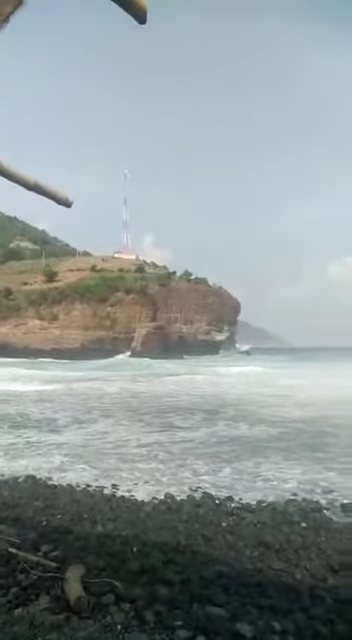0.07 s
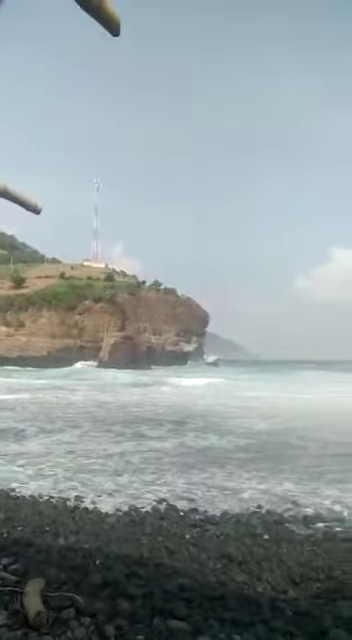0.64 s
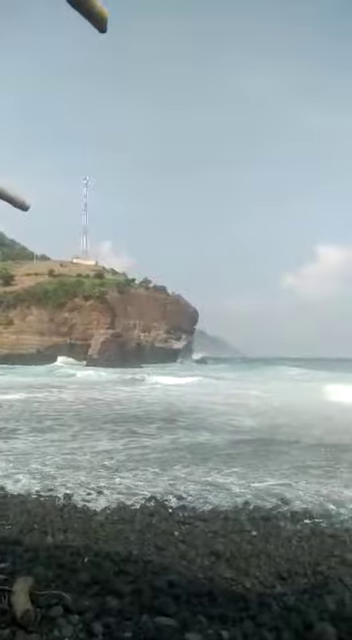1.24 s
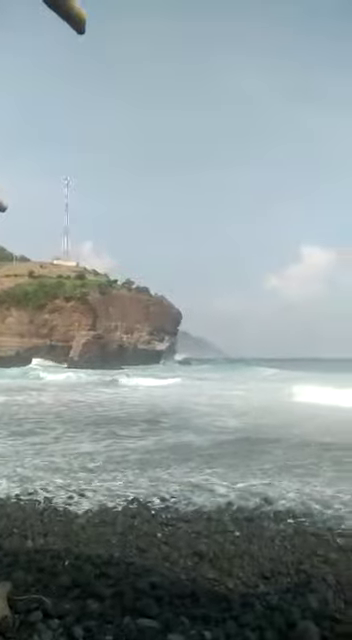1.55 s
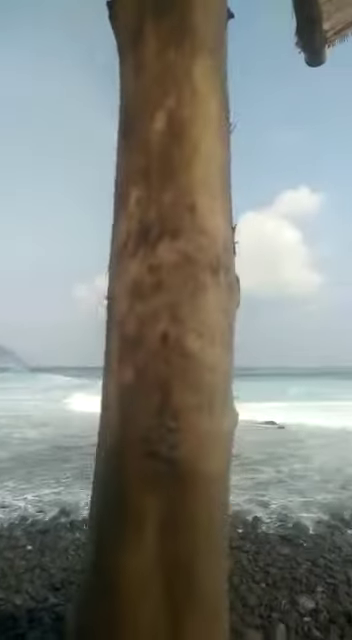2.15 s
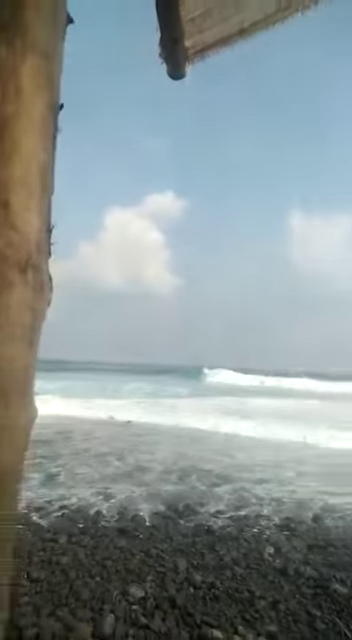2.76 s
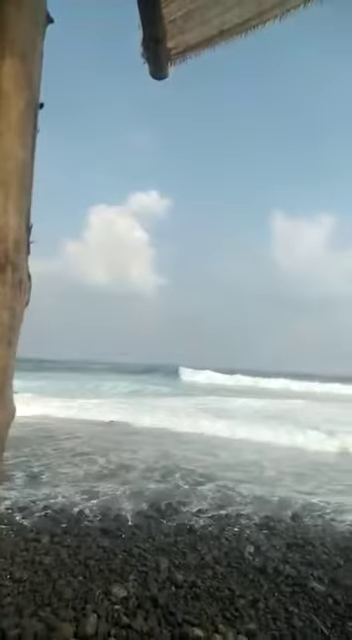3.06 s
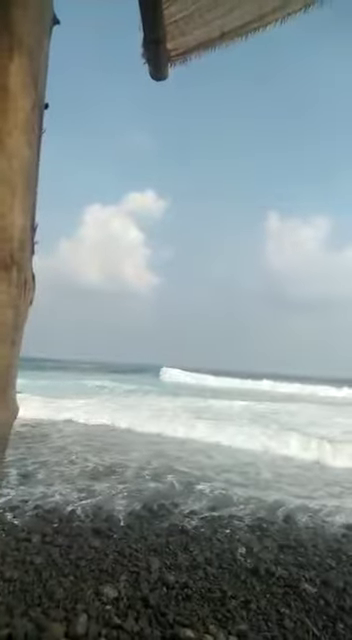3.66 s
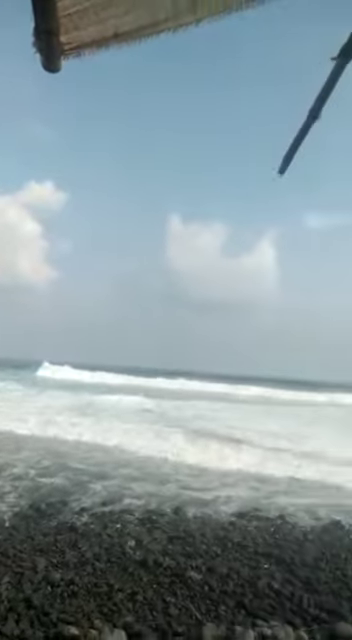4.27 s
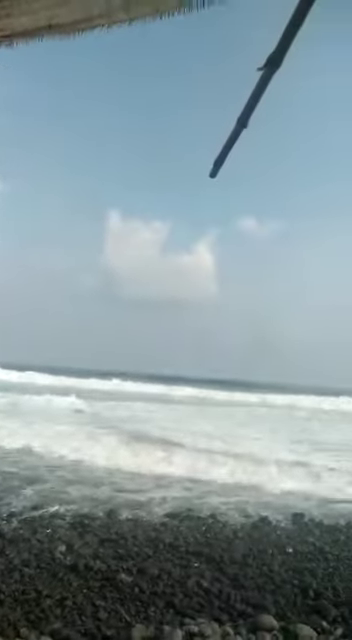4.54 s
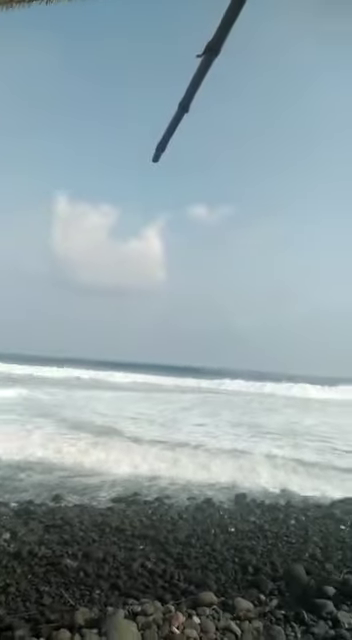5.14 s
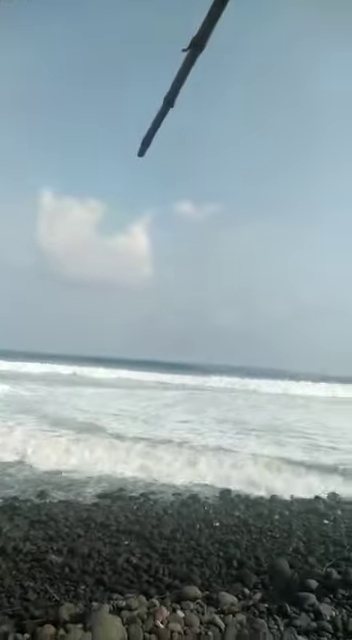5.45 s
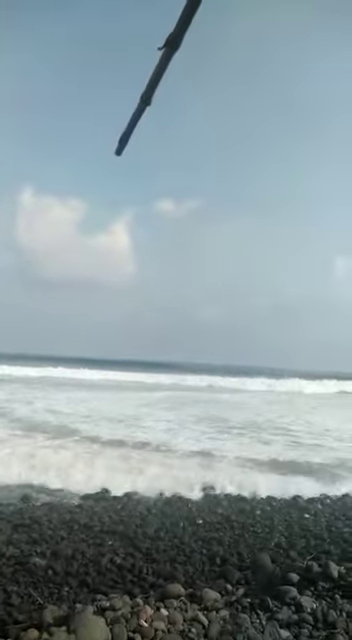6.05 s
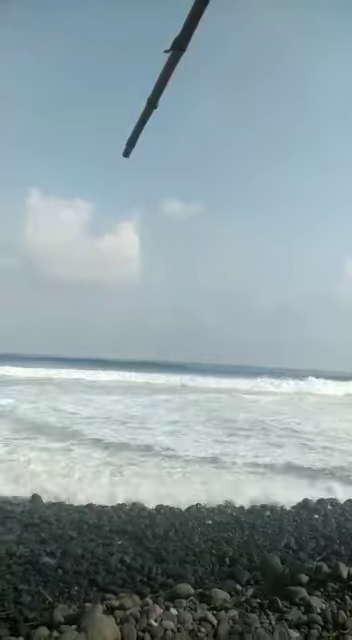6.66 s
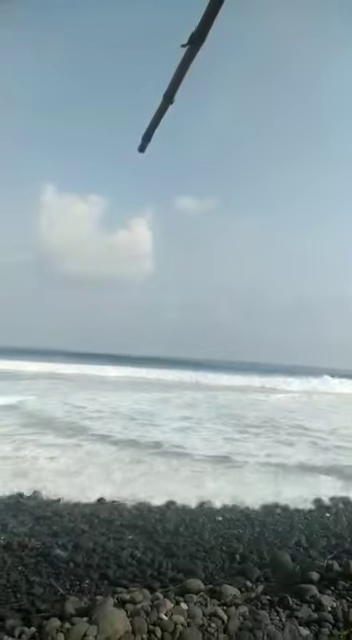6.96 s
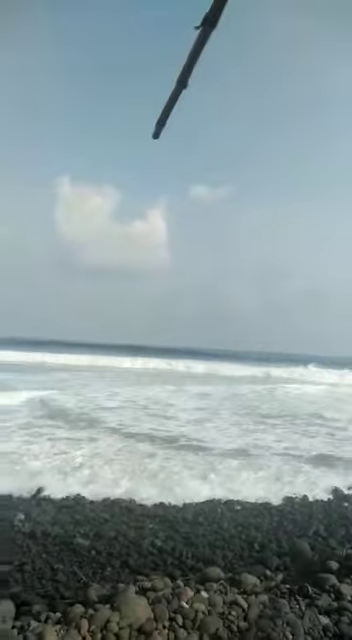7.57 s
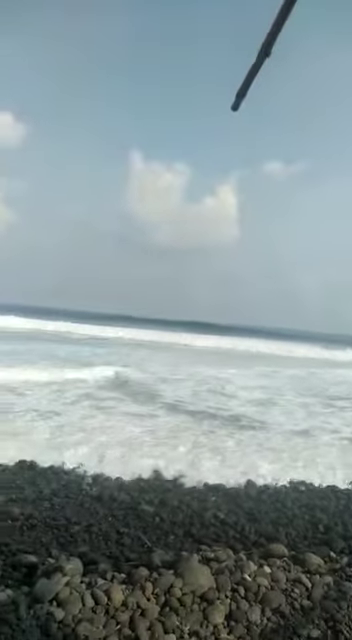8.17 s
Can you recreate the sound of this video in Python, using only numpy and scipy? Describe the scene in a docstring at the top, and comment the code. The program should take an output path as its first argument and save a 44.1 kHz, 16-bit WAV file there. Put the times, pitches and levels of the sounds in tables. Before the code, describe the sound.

On a cobble beach, the distant sea roars dully and pebbles clink faintly while hard gusts of wind thump the microphone, mostly on the right. A wave then breaks with a gurgling churn, and its foam rushes closer, growing louder. It lands with tumbling water, clacking stones and a fizz of tiny bubbles, then begins to ebb as the gusts pick up again.

```python
"""Rough surf on a cobble beach, at two ports of a turning hand-held microphone in gusty wind.
First the far sea roars and pebbles clink; gusts rumble, the hardest overloading the right port.
From 2.4 s a wave breaks: a patchy churn with gulp-like tones; foam and spray run shoreward.
Near 6.5 s it lands: water tumbles, pebbles clack, tiny bubbles hiss on the stones.
By 8 s the wave is ebbing and the gusts pick up again."""
import sys
import numpy as np
from scipy import signal
from scipy.fft import rfft, irfft
from scipy.io import wavfile

SR = 44100
rng = np.random.default_rng(int(sys.argv[2]) if len(sys.argv) > 2 else 0)


def log_audio(samples):
    """Write samples as a 16-bit WAV file to the path given in sys.argv[1]."""
    # one column per channel
    frames = np.atleast_2d(samples).T
    # limit to full scale, then quantise
    limited = np.clip(frames, -1, 1)
    pcm = np.round(limited * 32767).astype(np.int16)
    wavfile.write(sys.argv[1], SR, pcm)


N = 366471
TIME_S = np.arange(N) / SR
BINS_HZ = np.fft.rfftfreq(1024, 1 / SR)
FRAMES_S = np.arange(N // 256 + 5) * 256 / SR

# Port coherence for sea sound: f/Hz, coherence/0-1
COHERENCE = [(60, 0.77), (200, 1), (430, 0.94), (710, 0.98), (1160, 1), (1890, 0.3), (3100, 0.05),
             (5000, 0.31), (13000, 0.18)]
# Right-port lag as the microphone turns: t/s, lag/ms
PORT_LAG = [(0, -.16), (1.8, -.14), (2.7, 0), (4, .02), (5.5, .065), (7.2, .095), (8.3, .05)]
# Far-sea spectrum: f/Hz, left/dB, right/dB
SEA_SPECTRUM = [(29.8, -44, -69), (83, -4.5, -3), (132, -7, -6), (187, -11.5, -15), (262, -7.5, -9),
                (422, -20, -21), (620, -20, -18), (950, -25, -26), (1190, -25, -26), (2200, -35.5, -60),
                (4000, -44, -36), (5300, -47, -35.5), (6400, -49, -33.5), (7500, -54, -31.5),
                (8200, -40, -35.5), (9400, -48.5, -40.5), (11800, -47, -54), (14000, -64, -53)]
# Narrow ringing bands per port: f/Hz, width/Hz, level/dB
BANDS_LEFT = [(1360, 73, -18), (1510, 90, -4), (1800, 120, 6), (2116, 260, -2), (2490, 150, -3),
              (3400, 50, -15), (4780, 62, 0), (6100, 60, -8), (8800, 60, -15)]
BANDS_RIGHT = [(1570, 60, -8), (1800, 32, 20), (2150, 50, -3), (2610, 42, 6.5), (3040, 140, -7),
               (5150, 45, -4), (5975, 61, 10.5), (6830, 85, 5)]
# Wind spectra: f/Hz, breeze/dB, hard gust/dB
WIND_SPECTRA = [(20, -26, -24), (45.4, -36, -25), (91.3, 11, 8), (123.6, 6, 4), (181, -5.5, 5.5),
                (291, -18.5, -1), (473, -53, -12.5), (743, -57, -18.5), (917, -49, -31.5), (1090, -52, -54),
                (2000, -70, -52), (5000, -83, -84)]
# Gust strengths: t/s, hold/s, left/dB, right/dB
PORT_GUSTS = [(0.006, 0.017, -26, -5), (0.202, 0.04, -51, -5), (0.277, 0.075, -41, -8.5),
              (0.467, 0.011, -47, -18), (0.524, 0.048, -23.5, -17.5), (0.935, 0.009, -31, -6),
              (1.325, 0.016, -57, -30), (1.416, 0.029, -53, -29), (1.788, 0.021, -46, -29),
              (2.016, 0.06, -23.5, -43), (2.067, 0.012, -43, -9.5), (2.403, .01, -40, -40),
              (3.966, 0.0092, -37, -37.5), (4.135, 0.032, -30, -39), (4.275, 0.014, -23, -28),
              (4.594, 0.036, -71, -25), (4.693, 0.02, -29, -24.5), (4.759, 0.079, -34.5, -20.5),
              (4.868, 0.014, -52, -24.5), (4.987, 0.015, -24, -32), (5.525, 0.13, -47, -31),
              (5.868, 0.013, -57, -26.5), (6.048, 0.006, -39, -29), (6.145, 0.022, -44, -26),
              (6.306, 0.0091, -31.5, -42), (6.693, 0.17, -75, -33.5), (7.085, 0.056, -48, -27),
              (7.244, 0.033, -53, -29), (7.38, 0.037, -57, -29.5), (7.837, 0.11, -70, -21),
              (7.937, 0.065, -65, -23.5), (8.04, 0.13, -61, -26.5), (8.218, 0.025, -43, -29)]
# Large eddies at the right port: t/s, level/dB, f/Hz
EDDY_SLAPS = [(0.009, -2.5, 323), (0.023, -3, 196), (0.2092, -2, 262), (0.226, -4, 420), (0.234, -6, 215),
              (0.247, -8, 160), (0.269, -8, 215), (0.284, -5, 190), (0.291, 2.5, 226), (0.312, -2.5, 290),
              (0.326, -4.5, 115), (0.343, -10.5, 258), (0.354, -8, 213), (0.488, -9, 149),
              (0.529, -10, 140), (0.566, -14, 295), (0.57, -13.5, 190), (0.591, -11, 139), (0.9415, 1, 251),
              (2.035, -17.5, 131), (2.0633, -3.5, 306), (2.08, -17.5, 200), (2.0942, -3.5, 152),
              (2.117, -14, 140), (4.627, -12, 107), (4.705, -12.5, 113), (4.737, -18, 167),
              (4.783, -10, 195), (4.829, -13, 144), (5.002, -15, 136), (6.047, -14, 215), (6.064, -16, 215),
              (6.164, -20, 109), (6.325, -20, 157), (7.853, -9, 169), (7.894, -7.5, 179), (7.963, -10, 159)]
# Pebble clinks in the backwash: t/s, level/dB, f/Hz, length/s, left-right/dB
PEBBLE_CLINKS = [(0.026, -40.5, 2040, 0.065, 23), (.22, -38.5, 1887, 0.046, 4),
                 (0.392, -43, 1950, 0.059, 13), (0.434, -45, 1690, 0.077, -19),
                 (0.602, -40, 1730, 0.045, -3), (.74, -41, 2050, 0.067, 20), (.84, -39, 1840, 0.088, 4),
                 (0.908, -43, 2640, .03, -20), (1.38, -48, 2640, 0.033, -20), (.92, -49, 2196, .03, -6),
                 (1.186, -46, 2583, 0.04, -16), (1.335, -41, 2040, 0.056, 17), (1.34, -38, 1790, .03, -2),
                 (1.789, -38, 1390, 0.031, 16), (2.02, -37.5, 1970, 0.029, 20),
                 (2.051, -39, 1600, 0.035, 5), (2.09, -34, 1690, 0.031, -7), (2.117, -39, 1937, 0.028, 18),
                 (2.157, -36, 1400, 0.052, 20), (2.219, -42, 1600, .025, -20), (2.35, -40, 1520, 0.032, 4),
                 (2.463, -41, 1360, 0.022, 8), (2.54, -41, 2920, 0.022, -18), (2.56, -42, 2210, .04, -17),
                 (2.763, -40, 2050, .04, -6), (2.808, -40, 1655, 0.036, 0), (3.068, -40.5, 2390, 0.038, -9),
                 (3.209, -43, 2420, 0.067, -12), (3.343, -32.5, 1617, 0.044, 7)]
# Thin chirps at low water, right port: t/s, level/dB, f/Hz, length/s
HIGH_CHIRPS = [(0.085, -50, 6900, 0.11), (0.333, -48.5, 6940, 0.035), (.42, -48, 7000, 0.082),
               (0.628, -56, 6900, .04), (.74, -46.5, 6830, 0.084), (0.906, -47.5, 6930, 0.044),
               (1.113, -45, 6860, 0.072), (1.232, -42, 6670, 0.035), (1.472, -45.5, 6830, 0.056),
               (1.82, -47, 6890, .05), (1.976, -39.5, 6660, 0.062), (2.073, -44.5, 6930, 0.057),
               (2.339, -42.5, 6761, .025), (2.42, -52, 6890, 0.15), (2.53, -43, 6730, 0.054),
               (2.583, -44, 6890, .1)]
# Wave run-in: t/s, foam/dB, spray/dB, hiss/dB
WAVE_LEVELS = [(0, -54.5, -68, -73), (.7, -48, -55.5, -60.5), (1.5, -54.5, -56.5, -58.5),
               (2.25, -48.5, -51, -55.5), (2.6, -49.5, -52.5, -52.5), (3.15, -43, -45, -44),
               (3.6, -41, -49, -45), (4.1, -37, -39, -37.8), (4.7, -38, -45.5, -37.5),
               (5.1, -34, -45.5, -36), (6.55, -34, -41.5, -33.5), (7.3, -38, -46.5, -36),
               (7.8, -39.5, -45.5, -39.5), (8.3, -47.5, -45.5, -41)]
# Foam, spray and hiss spectra: f/Hz, left/dB, right/dB
FOAM_SPECTRUM = [(1000, -26.5, -31), (1292, 0.5, -23), (1406, 9.5, -6), (1596, 5, 5), (1810, 4.5, -41),
                 (1756, 2.5, 8), (2100, -3.5, -9.5), (2096, 1.5, -33), (2200, -44, -38)]
SPRAY_SPECTRUM = [(2000, -30, -45), (2030, -15, 4.5), (2390, -8, 10), (2455, -6, 3.5), (2660, -5.5, 2),
                  (2870, 5, -5.5), (2800, 2.5, 8), (3180, -0.5, 3), (3370, 0, -3.5), (3643, 0, -9.5),
                  (3740, -19.5, -49)]
HISS_SPECTRUM = [(3400, -36, -42), (4000, -13, -14), (3970, -18, -26), (4150, -4.5, -12), (4720, 2.5, -1),
                 (5270, -9, 4), (6100, -2.5, 5.5), (6700, -1, 7), (7190, -1, 3), (7270, -16, 13),
                 (7340, -15, 12), (7850, -17, 4), (8120, -25, 4.5), (8530, -24, 2), (8670, -28, -11.5),
                 (8700, -9, -1.5), (10300, -8.5, -4), (12100, -16, -10.5), (14200, -40, -13)]
# Hiss treble gains: t/s, right 6.65 kHz/dB, right 8 kHz/dB, top treble at both ports/dB
HISS_TREBLE = [(0, -5.5, 10, -2.5), (2.5, 10, -1.5, -2.5), (3.4, 11, -3, -6), (4.25, 9.5, 10, -1.5),
               (4.8, -2, -1.5, 1), (6.6, 1.5, 2, -1.5), (7.4, -10.5, -4, -3.5), (8.3, -21, -21, -1)]
# Reflection off a shelter, rows left and right: delay/ms, ripple/dB
SHELTER_ECHO = [(2.7, 3.5), (1.9, 3)]
# Short gulp-like tones in the surf: t/s, level/dB, f/Hz, length/s
GULP_TONES = [(2.436, -34.5, 709, 0.018), (2.74, -34.5, 265, 0.04), (2.742, -37, 560, 0.021),
              (2.847, -33, 636, 0.019), (2.99, -34, 805, 0.06), (3.084, -41, 990, 0.1),
              (3.2, -34.5, 823, 0.089), (3.38, -36.5, 830, .035), (3.535, -34.5, 843, 0.035),
              (3.643, -32, 692, 0.059), (3.785, -36.5, 997, 0.099), (3.943, -28.5, 796, 0.042),
              (4.02, -31.5, 818, 0.11), (4.169, -28, 725, 0.034), (4.291, -33.5, 723, 0.049),
              (4.406, -29.5, 708, 0.074), (4.577, -30, 1005, 0.027), (4.667, -33.5, 588, 0.022),
              (4.815, -34, 814, 0.027), (4.854, -26.5, 668, 0.043), (4.905, -32.5, 500, .02),
              (5.007, -30, 385, 0.041), (5.082, -32.5, 366, 0.062), (5.092, -33.5, 760, 0.048),
              (5.156, -33, 987, 0.07), (5.196, -32, 917, 0.049), (5.339, -31, 890, 0.024),
              (5.523, -25.5, 600, 0.015), (5.524, -30, 848, 0.089), (5.626, -31, 253, 0.044),
              (5.627, -31, 680, .04), (5.669, -32, 834, 0.04), (5.77, -52, 850, 0.078),
              (5.952, -32.5, 900, 0.076), (6.044, -26, 230, 0.023), (6.049, -43, 400, 0.023),
              (6.073, -31.5, 1020, 0.028), (6.096, -27.5, 434, 0.026), (6.115, -28.5, 240, 0.051),
              (6.133, -34.5, 953, 0.037), (6.194, -25.5, 377, 0.041), (6.257, -28, 300, 0.031),
              (6.304, -30, 351, 0.094), (6.312, -34, 765, 0.066), (6.468, -40, 563, 0.037),
              (6.469, -34, 746, 0.041), (6.558, -30.5, 389, 0.039), (6.617, -22.5, 258, 0.021),
              (6.78, -30.5, 282, 0.029), (6.869, -30, 372, 0.03), (6.867, -34.5, 585, 0.033),
              (7.039, -32.5, 603, 0.028), (7.053, -32, 270, 0.028), (7.218, -32, 357, 0.053),
              (7.354, -35, 1020, 0.021), (7.523, -33.5, 1104, 0.019), (7.792, -34.5, 1296, 0.026),
              (7.926, -35, 1035, 0.036)]
# Collapsing-water and churn spectra: f/Hz, left/dB, right/dB
TUMBLE_SPECTRUM = [(50, -36, -34), (120, -36, -15), (227, 2.5, 7), (271, -8, -5.5), (415, 5.5, 5),
                   (475, -30, -23), (565, 3, 1), (810, -46, -57)]
CHURN_SPECTRUM = [(480, -41, -40), (614, 2.5, -14), (648, 6, -15), (696, 12, -5), (875, 14, -3),
                  (977, 4.5, 2.5), (1068, -22, 2.5), (1190, -49, -27), (1390, -21.5, -56)]
# Rings of pebbles shoved up the beach: f/Hz, level/dB, decay/s
PEBBLE_MODES = [(1038, -10, 0.0084), (1330, -17, 0.0054), (1630, 2.5, 0.0083), (1852, -5, 0.012),
                (2950, -8, 0.0075), (4630, -10, 0.004)]


def amp(db):
    """dB to gain."""
    return 10 ** (np.asarray(db) / 20)


def unit(x):
    """Scale to rms 1."""
    return x / np.sqrt(np.mean(abs(x) ** 2) + 1e-20)


def curves(rows, t_s=TIME_S):
    """Time-table columns at t_s."""
    knots_s, *columns = np.transpose(rows)
    return np.array([np.interp(t_s, knots_s, c) for c in columns])


def spectra(rows):
    """Frequency-table columns: columns x 1 x bins."""
    hz, *columns = np.transpose(rows)
    return np.array([np.interp(np.log(BINS_HZ + 1), np.log(hz), c) for c in columns])[:, None]


def band(centre_hz, width_hz):
    """Bell over frequency, peak 1."""
    return np.exp(-((BINS_HZ - centre_hz) / width_hz) ** 2)


def ports(left, right):
    """Per-port values: ports x 1 x 1."""
    return np.array([left, right])[:, None, None]


def plateau(start_s, end_s, rise_db_per_s, fall_db_per_s):
    """Attack, hold at 0, release, in dB."""
    rise_db = -rise_db_per_s * np.maximum(start_s - TIME_S, 0)
    return rise_db - fall_db_per_s * np.maximum(TIME_S - end_s, 0)


def white():
    """Independent noise spectra: ports x frames x bins."""
    shape = (2, len(FRAMES_S), len(BINS_HZ))
    return rng.standard_normal(shape) + 1j * rng.standard_normal(shape)


def waveform(z):
    """Short-time spectra to a waveform of rms 1."""
    return unit(signal.istft(z.swapaxes(-1, -2), nperseg=1024, noverlap=768)[1][..., :N])


def blur(x, sigma_steps, axis):
    """Gaussian smoothing along one axis."""
    n = x.shape[axis]
    bell = np.exp(-2 * (np.pi * sigma_steps * np.fft.rfftfreq(2 * n)) ** 2)
    x = np.moveaxis(x, axis, -1)
    mirrored = np.concatenate([x, x[..., ::-1]], -1)
    return np.moveaxis(irfft(rfft(mirrored) * bell)[..., :n], -1, axis)


def smear(x, span_s, span_hz):
    """Smooth over frames and bins."""
    return blur(blur(x, span_s / FRAMES_S[1], axis=-2), span_hz / BINS_HZ[1], axis=-1)


def patchy(z, depth_db, span_s, span_hz, threshold):
    """Lift spots stronger than threshold (in sigmas), sink the rest: watery patches."""
    strength = smear(abs(z), span_s, span_hz)
    excess = unit(strength - strength.mean()) - threshold
    return z * amp(depth_db * np.tanh(1.15 * excess))


def splashing(depth_db, span_s, span_hz):
    """Quick random wide-band swells in dB: frames x bins."""
    return depth_db * unit(smear(white()[0].real, span_s, span_hz))


def balance(centre_db, turn_db_per_ms, drift_db_per_s):
    """Left-right dB: follows the port lag, drifts as the wave runs along the beach."""
    return centre_db + turn_db_per_ms * curves(PORT_LAG)[0] + drift_db_per_s * (TIME_S - TIME_S.mean())


def placed(x, level_db, pan_db):
    """Set level, pan at constant power."""
    sides = amp(np.array([pan_db, -pan_db]) / 2)
    power = np.mean(x ** 2, axis=1, keepdims=True)
    return x * amp(level_db) * sides / np.sqrt(np.mean(power * sides ** 2, axis=0))


def sea_noise():
    """Noise arriving over the water: partly coherent at the ports, later at one."""
    left, other = white()
    coherence = np.clip(spectra(COHERENCE)[0], 0, 1)
    lag_s = curves(PORT_LAG, FRAMES_S).T / 1000
    right = coherence * left + np.sqrt(1 - coherence ** 2) * other
    return np.array([left, right * np.exp(-2j * np.pi * BINS_HZ * lag_s)])


def far_sea():
    """Smooth, dull roar of distant breakers."""
    return amp(-44.5) * waveform(sea_noise() * amp(spectra(SEA_SPECTRUM)))


def ringing_bands():
    """Faint, narrow ringing bands at each port, swelling and fading in the quiet wash."""
    power = [sum(amp(db) ** 2 / (1 + (2 * (BINS_HZ - hz) / width_hz) ** 2) ** 2
                 for hz, width_hz, db in port) for port in (BANDS_LEFT, BANDS_RIGHT)]
    depth_db = ports(9.5, 5.0) * (BINS_HZ < 4000)
    patches = patchy(sea_noise(), depth_db, span_s=0.0073, span_hz=40, threshold=0.76)
    swell_db = splashing(depth_db=np.where(BINS_HZ > 4000, 3.2, 1.3), span_s=0.025, span_hz=200)
    return amp(-50) * waveform(patches * amp(swell_db) * np.sqrt(power)[:, None])


def gust_strength(breeze_db=-88, wake_cap_db=-12.5, rise_db_per_s=2597):
    """Wind dB per port: a gust hits at once; a hard one drops fast to a slower-dying wake."""
    level_db = np.full((2, N), float(breeze_db))
    for at_s, hold_s, left_db, right_db in PORT_GUSTS:
        peak_db = np.array([[left_db], [right_db]])
        blow_db = peak_db + plateau(at_s, at_s + hold_s, rise_db_per_s, fall_db_per_s=608)
        fade_db = plateau(at_s, at_s + hold_s, rise_db_per_s, fall_db_per_s=97)
        wake_db = np.minimum(peak_db, wake_cap_db) + fade_db
        level_db = np.maximum(level_db, np.maximum(blow_db, wake_db))
    return level_db


def wind():
    """Separate turbulence at each port; harder gusts shed smaller eddies and sound brighter."""
    level_db = gust_strength()
    hardness = np.clip((level_db + 27.5) / 19, 0, 1)
    eddies = patchy(white(), depth_db=4, span_s=0.012, span_hz=28, threshold=0.1)
    breeze, gust = (waveform(eddies * amp(colour_db)) for colour_db in spectra(WIND_SPECTRA))
    rumble = (1 - hardness) * breeze + hardness * gust
    rumble /= np.sqrt(blur(rumble ** 2, 0.01 * SR, axis=1) + 1e-6)  # force, not chance, sets the level
    return rumble * amp(level_db - 1.5 * hardness)


def slaps(stretch_per_cycle=0.32, snap_db=-27.5, snap_db_per_db=2.8, snap_cycles=0.034):
    """A large eddy sucks, pushes, sucks at the right port, ever slower; hard ones snap at the front."""
    right = np.zeros(N)
    for at_s, db, hz in EDDY_SLAPS:
        near = abs(TIME_S - at_s) < 0.04
        period_ratio = 1 + stretch_per_cycle * (TIME_S[near] - at_s) * hz
        cycles = np.log(np.maximum(period_ratio, 1e-6)) / stretch_per_cycle
        front = (cycles + 1 / 4) / snap_cycles
        right[near] += amp(db) * np.cos(2 * np.pi * cycles) * np.exp(-cycles ** 2)
        right[near] += amp(snap_db + snap_db_per_db * db) * np.tanh(4 * front) * np.exp(-abs(front))
    return np.array([np.zeros(N), right])


def eddy_shielding():
    """Wind gain: a large eddy on the right port partly keeps the small ones off."""
    cover = np.max([np.exp(-((TIME_S - at_s) * hz / 1.2) ** 2) for at_s, _, hz in EDDY_SLAPS], axis=0)
    return np.array([np.ones(N), 1 - 0.54 * cover])


def clinks_and_chirps(flutter_depth=0.94, flutter_s=0.0031, chirp_gain_db=0.5, chirp_pan_db=-40):
    """Pebble clinks and thin chirps: short fluttering rings above the quiet wash."""
    out = np.zeros((2, N))
    flutter = flutter_depth * unit(blur(rng.standard_normal((2, N)), flutter_s * SR, axis=1))
    chirps = [(at_s, db + chirp_gain_db, hz, length_s, chirp_pan_db)
              for at_s, db, hz, length_s in HIGH_CHIRPS]
    for at_s, db, hz, length_s, pan_db in PEBBLE_CLINKS + chirps:
        near = abs(TIME_S - at_s) < 0.15
        t = TIME_S[near] - at_s
        tremor, wobble_rad = flutter[:, near]
        sides = amp(np.array([[pan_db], [-pan_db]]) / 2)
        envelope = np.exp(-(2 * t / length_s) ** 2) * (1 + tremor / 2)
        ring = envelope * np.sin(2 * np.pi * hz * t + wobble_rad)
        out[:, near] += amp(db) * ring * sides / np.linalg.norm(sides)
    return out


def landing_band(centre_hz, width_hz):
    """Band weight, growing from 5.7 s: the colour shifts as the front hits the stones."""
    return np.clip((FRAMES_S - 5.7) / 3.9, 0, 1)[:, None] * band(centre_hz, width_hz)


def white_water():
    """Foam and spray: a dense, heaving rush at the wave's height, patchy when calm."""
    foam_db, spray_db, _ = curves(WAVE_LEVELS)
    foam_pan_db = balance(centre_db=-0.5, turn_db_per_ms=53, drift_db_per_s=0.5)
    spray_pan_db = balance(centre_db=-0.5, turn_db_per_ms=-57, drift_db_per_s=4.0)
    calm = np.clip((-33 - curves(WAVE_LEVELS, FRAMES_S)[0]) / 14, 0, 1)[:, None]
    froth = patchy(sea_noise(), depth_db=7, span_s=0.016, span_hz=29.6, threshold=0.64 * calm + 0.35)
    drops = patchy(sea_noise(), depth_db=10.5, span_s=0.028, span_hz=40.7, threshold=calm + 0.032)
    large_bubbles_db = 26.5 * landing_band(centre_hz=1110, width_hz=105)
    heave_db = splashing(depth_db=1.6, span_s=0.009, span_hz=220)
    foam = waveform(froth * amp(spectra(FOAM_SPECTRUM) + large_bubbles_db + heave_db))
    spray = waveform(drops * amp(spectra(SPRAY_SPECTRUM) + heave_db))
    return placed(foam, foam_db, foam_pan_db) + placed(spray, spray_db, spray_pan_db)


def shelter_ripple():
    """Comb ripple in dB from the shelter's reflection; its delay slides with the port lag."""
    slide_ms = 0.54 * curves(PORT_LAG, FRAMES_S).T
    return np.array([db * np.cos(2 * np.pi * BINS_HZ * (ms + slide_ms) / 1000)
                     for ms, db in SHELTER_ECHO])


def swash():
    """Tiny bubbles burst on the cobbles: dense sheen left, patchy fizz right."""
    hiss_db = curves(WAVE_LEVELS)[2]
    pan_db = balance(centre_db=5.5, turn_db_per_ms=-16, drift_db_per_s=1.0)
    thin = np.clip((hiss_db.max() - np.interp(FRAMES_S, TIME_S, hiss_db)) / 14, 0, 1)[:, None]
    depth_db = ports(3, 10) + thin * ports(4, 0)
    fizz = patchy(sea_noise(), depth_db, span_s=0.02, span_hz=34.6, threshold=1.4 * thin + 0.19)
    fizz /= np.sqrt(np.mean(abs(fizz) ** 2, axis=2, keepdims=True))  # equal power per frame
    top_shelf = np.clip((BINS_HZ - 7800) / 1500, 0, 1)
    bands = np.array([band(6650, width_hz=520), band(7990, width_hz=300), top_shelf])
    gains_db = curves(HISS_TREBLE, FRAMES_S).T
    treble_db = np.array([gains_db[:, 2:] @ bands[2:], gains_db @ bands])
    uneven_db = shelter_ripple() + splashing(depth_db=1.3, span_s=0.0059, span_hz=580)
    colour_db = spectra(HISS_SPECTRUM) + uneven_db * (0.56 + thin) + treble_db
    return placed(waveform(fizz * amp(colour_db)), hiss_db, pan_db)


def gulps(flutter_depth=0.8, flutter_s=0.0024, attack_share=0.48):
    """Short, fluttering, gulp-like tones in the surf."""
    out = np.zeros(N)
    flutter = flutter_depth * unit(blur(rng.standard_normal((2, N)), flutter_s * SR, axis=1))
    for (at_s, db, hz, length_s), phase in zip(GULP_TONES, rng.random(len(GULP_TONES))):
        near = abs(TIME_S - at_s) < 0.12
        t = TIME_S[near] - at_s
        tremor, wobble_rad = flutter[:, near]
        slope_s = length_s * np.where(t < 0, attack_share, 1 - attack_share)
        envelope = np.exp(-(t / slope_s) ** 2) * (1 + tremor / 2)
        out[near] += amp(db) * envelope * np.sin(2 * np.pi * (hz * t + phase) + wobble_rad)
    return out * amp([[0], [-3]])


def tumble(landing_s=6.52, slope_db_per_s=5.5, deep_below_hz=710):
    """Collapsing water: swells toward the landing, jumps at each deep gulp."""
    bed_db = -41 - slope_db_per_s * abs(TIME_S - landing_s)
    jumps_db = [db - 7.5 + plateau(at_s, at_s, rise_db_per_s=600, fall_db_per_s=246)
                for at_s, db, hz, _ in GULP_TONES if hz < deep_below_hz]
    level_db = np.max([bed_db] + jumps_db, axis=0)
    patches = patchy(sea_noise(), depth_db=9.5, span_s=0.037, span_hz=30.8, threshold=0.59)
    return waveform(patches * amp(spectra(TUMBLE_SPECTRUM))) * amp(level_db)


def churn(full_db=-41.5, idle_db=-63):
    """Patchy, watery mid-range rush of the breaking wave: builds, holds, fades."""
    level_db = full_db + plateau(start_s=2.97, end_s=4.73, rise_db_per_s=26, fall_db_per_s=1.5)
    patches = patchy(sea_noise(), depth_db=9, span_s=0.016, span_hz=50, threshold=0.05)
    colour_db = spectra(CHURN_SPECTRUM) - 14.5 * landing_band(centre_hz=880, width_hz=120)
    return waveform(patches * amp(colour_db)) * amp(np.maximum(level_db, idle_db))


def clatter(clacks_per_s=420, spread_db=5.5, attack_s=0.0016):
    """Pebbles of many sizes clack at random, loudest after the landing; a few stand out."""
    out = np.zeros((2, N))
    t = np.arange(2048) / SR
    chance = clacks_per_s / (3 * len(PEBBLE_MODES) * SR)
    for hz, db, decay_s in PEBBLE_MODES:
        envelope = amp(db) * (1 - np.exp(-t / attack_s)) * np.exp(-t / decay_s)
        for detune in rng.uniform(0.94, 1.06, 3):
            hits = rng.random(N) < chance
            force = amp(spread_db * np.minimum(rng.exponential(1, N), 3))
            ring = envelope * np.sin(2 * np.pi * hz * detune * t)
            sides = amp(rng.normal(0, 3, (2, 1)))
            out += sides * signal.oaconvolve(hits * force, ring)[:N]
    return unit(out) * amp(-45 + plateau(start_s=6.94, end_s=8, rise_db_per_s=6, fall_db_per_s=20))


def scene():
    """Sea, wave and wind, in stereo."""
    sea = far_sea() + ringing_bands() + clinks_and_chirps()
    wave = tumble() + churn() + gulps() + white_water() + swash() + clatter()
    return sea + wave + wind() * eddy_shielding() + slaps()


def record(dry, low_cut_hz=62, high_cut_hz=13950):
    """Microphone: bass cut, overload on the hardest gusts, band limit."""
    thin = signal.sosfilt(signal.butter(3, low_cut_hz, "highpass", fs=SR, output="sos"), dry)
    clipped = thin / (1 + thin ** 30) ** (1 / 30)
    low_pass = signal.firwin(511, high_cut_hz, window=("kaiser", 9), fs=SR)
    return signal.oaconvolve(clipped, low_pass[None], "same", axes=1)


dry = scene()
out = record(dry)
log_audio(out)
```